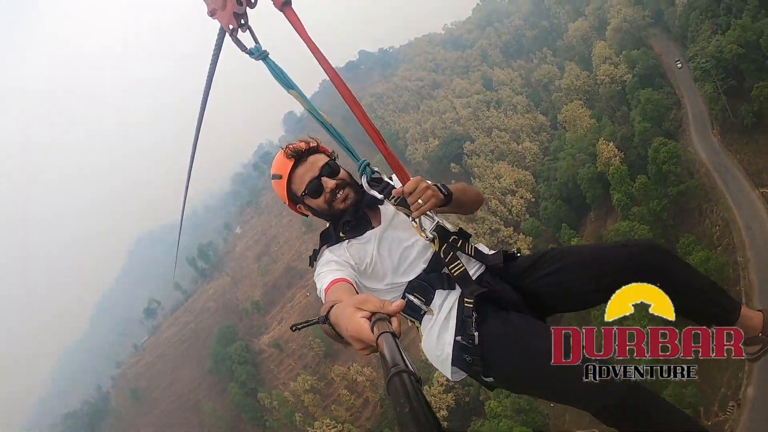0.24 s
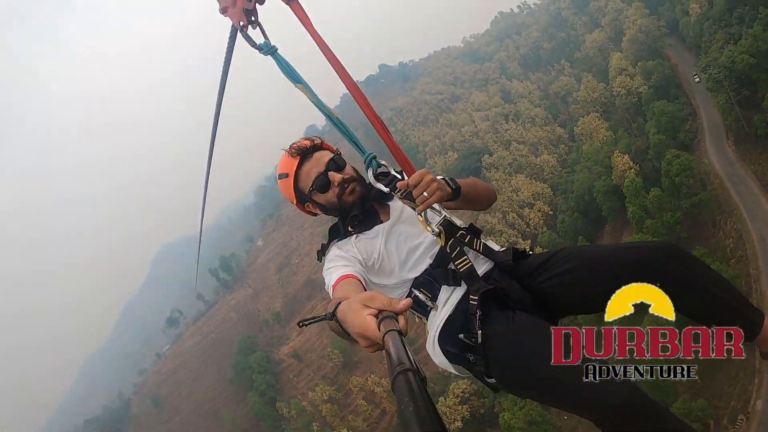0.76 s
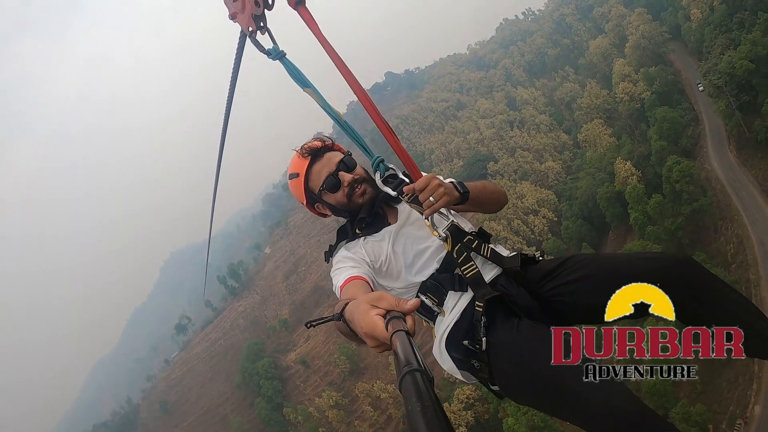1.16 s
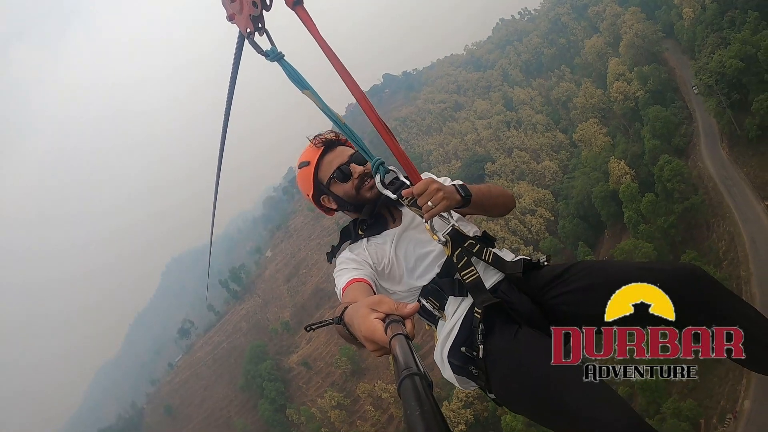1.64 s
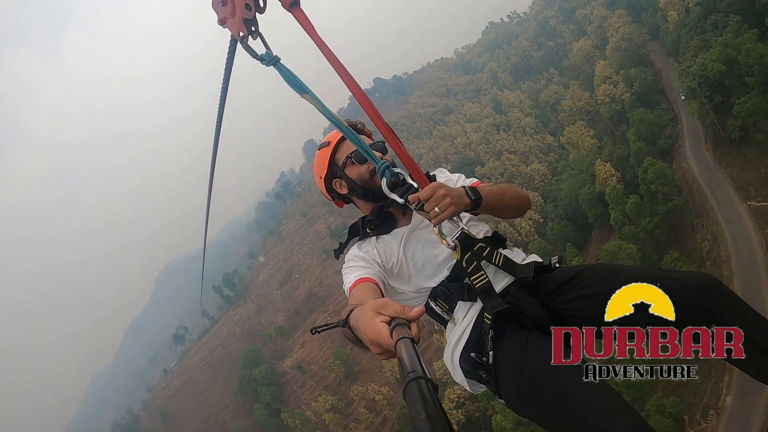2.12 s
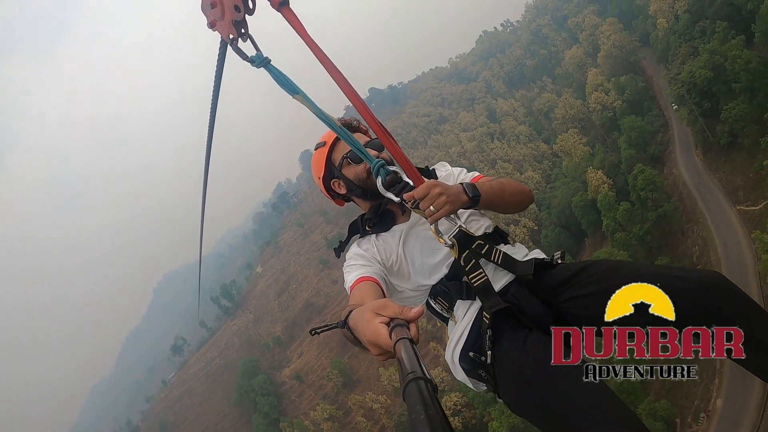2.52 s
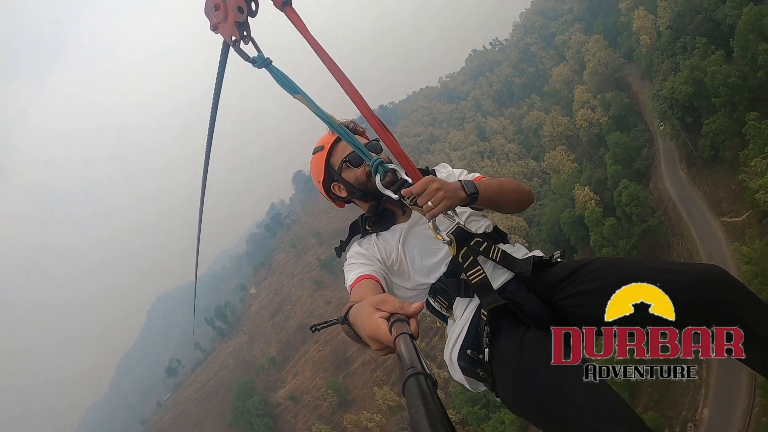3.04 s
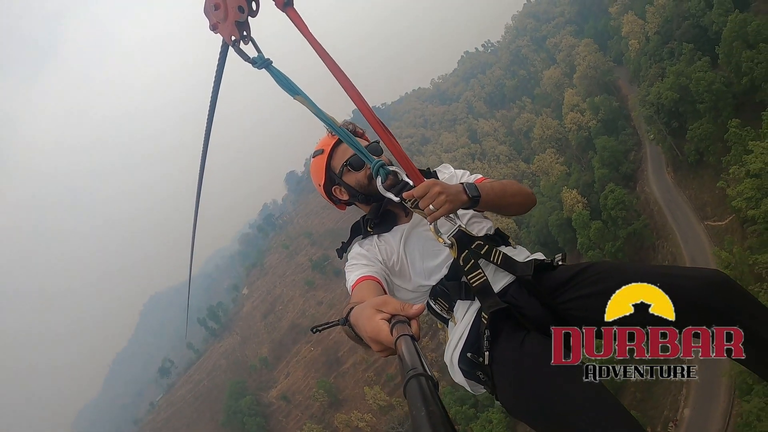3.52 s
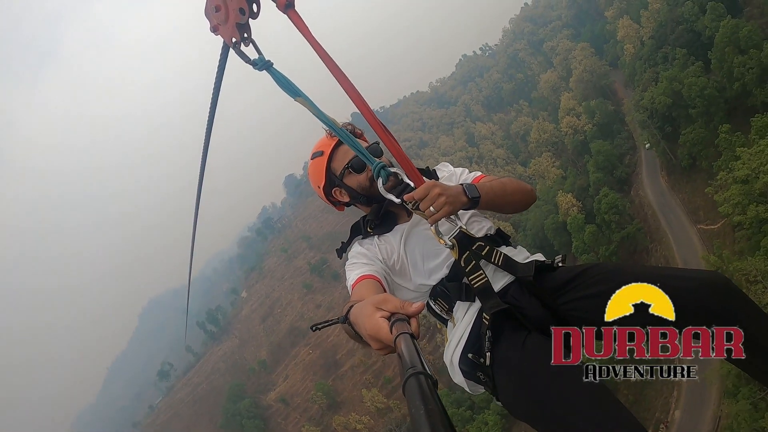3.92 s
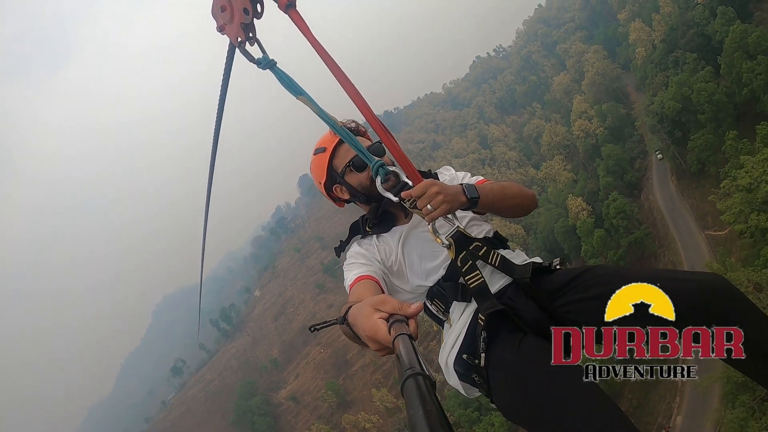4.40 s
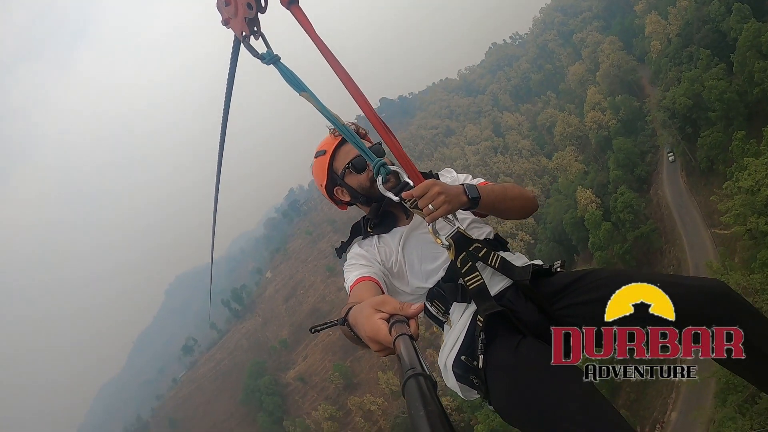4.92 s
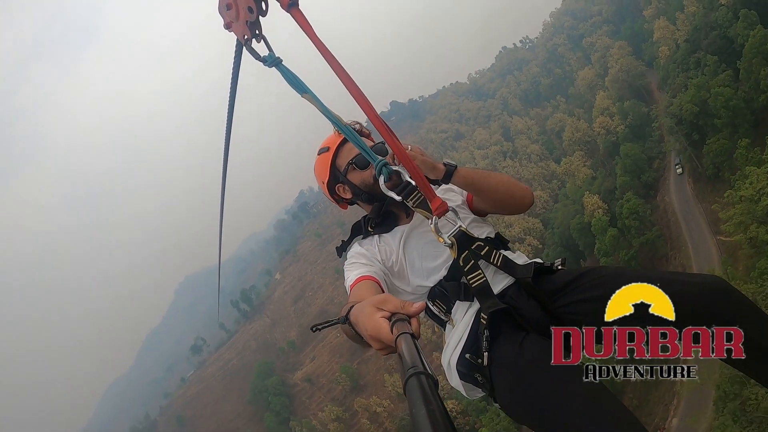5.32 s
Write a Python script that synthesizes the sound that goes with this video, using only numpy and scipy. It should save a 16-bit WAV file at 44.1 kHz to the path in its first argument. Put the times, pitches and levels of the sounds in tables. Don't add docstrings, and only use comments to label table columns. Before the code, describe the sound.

A rider's zipline pulley whirs continuously overhead, heard close and outdoors. Fine grinding patter on steel strands carries a nasal, wavering ring and a thinner hiss on top. Wind knocks low against the microphone, strongest in the first second and again near the middle. The rolling flickers with small hops, keeps its pace and is cut off mid-ride.

```python
import sys
import numpy as np
from scipy import signal
from scipy.fft import rfft, irfft
from scipy.io import wavfile
from scipy.ndimage import uniform_filter1d, minimum_filter1d

SR = 44100
rng = np.random.default_rng(int(sys.argv[2]) if len(sys.argv) > 2 else 0)


def bounce(signal):
    frames = np.transpose(np.atleast_2d(signal))
    limited = np.clip(frames, -1, 1)
    pcm = np.round(limited * 32767).astype(np.int16)
    wavfile.write(sys.argv[1], SR, pcm)


def attenuation_scalar(level_db):
    decades = np.asarray(level_db, float) / 20
    return 10 ** decades


N = 244755
HZ = np.maximum(np.fft.rfftfreq(N, 1 / SR), 1)

# pitch_hz, lead_rad
PORT_LEAD = [(230, .1), (700, -.08), (1000, -.62), (1350, -.87), (1800, -.37), (2300, 1.04), (2700, 1.07),
             (3650, .84), (3950, 1.8), (4150, 2.6), (4300, 1.0), (4600, .45), (5050, -1.6)]


def trolley():
    # pitch_hz, width_hz, level_db over the broad response, lean_rad to low or high side
    rings = [(521, 122, 5.5, -1.19), (1033, 33, 1.6, 1.03), (1128, 13, -8, 0.023), (1286, 33, -4, 1.1),
             (1325, 37, 1.5, 0.12), (1356, 19, 3.5, -0.86), (1570, 77, 1.5, 1.58), (1808, 26, 6.5, .7),
             (1963, 49, 3.5, -.4), (2110, 110, 3.5, -.8), (2353, 84, 8, -0.85), (2420, 55, -0.5, -1.1),
             (2630, 45, -1, -0.6), (3034, 24, 2.5, .3), (3215, 100, -8.5, 0.36), (3690, 40, 2, -1.3),
             (3875, 190, -3, -0.71), (4245, 80, -1.5, -.25)]
    # pitch_hz, level_db per Hz
    frame = [(230, -32), (400, -30.5), (650, -14), (850, -13), (1000, -1.5), (1200, -8.5), (1450, -15),
             (1750, -20.5), (2200, -16), (2750, -10.5), (3400, -9), (4100, -14), (4600, -20), (5200, -45.5)]
    # pitch_hz, share (0 to 1)
    likeness = [(230, 0.91), (400, 1), (3600, 0.97), (3900, 0.8), (4600, 0.8), (5200, 0.3), (6500, 0.5),
                (8500, 0.1), (15000, 0.3)]
    # pitch_hz, level_db per Hz
    hiss_left = [(5000, 0.5), (5500, -10), (6000, -11.8), (6700, -10.1), (8550, -20.2), (8800, -32),
                 (9300, -20.8), (9900, -27.7), (10300, -36.6), (10900, -27.3), (12600, -32.7), (13600, -49),
                 (14800, -41), (15700, -40)]
    hiss_right = [(5000, 1.5), (5500, -8.5), (6000, -7.4), (6700, -9.2), (7800, -22.4), (8500, -33.4),
                  (9500, -35.4), (11500, -35.1), (12200, -33.6), (12700, -41.6), (13600, -51.1),
                  (14200, -47.1), (15000, -46.5), (15700, -59.3)]
    cross_hz = 5050

    load_db, jolt_db = load()
    flutter = drift(17.0)
    growth_db = 6 * np.tanh(np.arange(N) / SR / 3.4)
    hum_db = -43 + 0.53 * load_db + growth_db + 1.5 + 1.5 * flutter
    whine_db = -21.5 + load_db - 1.5
    rasp_db = -25 + 0.25 * load_db + jolt_db + 0.92 * flutter
    hiss_db = -58.5 + 0.25 * load_db + 1.4 * jolt_db + 3.5 + 0.64 * flutter + 0.71 * drift(35)

    modes = 1
    for hz, width_hz, level_db, lean_rad in rings:
        modes = modes + attenuation_scalar(level_db) * np.exp(1j * lean_rad) / (1 + 2j * (HZ - hz) / width_hz)
    left = attenuation_scalar(at_hz(frame)) * modes
    right = left * right_port()
    common = at_hz(likeness)
    clicks = patter(per_s=14000, spread_db=2.5)

    out = 0
    for level_db, low_hz, high_hz in ((hum_db, 235, 803),
                                      (whine_db, 884, 1492),
                                      (rasp_db, 1457, cross_hz)):
        part = band(low_hz, high_hz, order=40)
        rolling = two_ports(clicks, left * part, right * part, common)
        out = out + attenuation_scalar(level_db) * evened(rolling, size=2500, share=0.72)

    treble = band(cross_hz, 15700, order=40)
    hiss_lead = np.exp(1j * at_hz(PORT_LEAD))
    hiss = two_ports(clicks, treble * attenuation_scalar(at_hz(hiss_left)), treble * attenuation_scalar(at_hz(hiss_right)) * hiss_lead, common)
    return out + attenuation_scalar(hiss_db) * hiss


def patter(per_s, spread_db):
    strength = np.minimum(rng.exponential(1, (2, N)), 4)
    sizes = attenuation_scalar(spread_db * strength) * rng.choice([-1, 1], (2, N))
    return sizes * (rng.random((2, N)) < per_s / SR)


def load():
    # time_s, level_db
    slow_load = [(0, 1.5), (.5, -0.5), (1.5, 0), (2.2, -1.5), (2.75, 0), (3.1, -0.5), (3.7, -1),
                 (4.1, -1.5), (4.6, -2), (5.1, -1), (5.55, -1.5)]
    # time_s of the peak, level_db
    jolts = [(.01, 2), (0.041, 0), (0.689, -4.5), (0.714, 1), (1.02, 1.5), (1.22, -4.5), (1.41, -3),
             (1.48, 1.5), (1.505, -2), (1.58, 2.5), (1.62, -4), (1.665, 0.5), (1.686, 0.5), (1.73, 3),
             (2.5, 3), (2.92, 3), (2.95, -2.5), (2.97, 2), (3.014, -0.5), (3.77, -3.5), (3.82, 2),
             (3.85, -2.5), (3.961, 2.5), (5.19, -5.5), (5.24, 0), (5.501, -3.5), (5.545, 1)]
    half_s = 0.018
    t = np.arange(N) / SR
    load_db, = in_time(slow_load)
    jolt_db = sum(db * np.clip(1 - np.abs(t - peak_s) / half_s, 0, 1) for peak_s, db in jolts)
    return load_db, jolt_db


def right_port():
    # pitch_hz, level_db
    shadow = [(230, 1), (600, 4.5), (860, 9.5), (900, 6.5), (1250, 6), (1750, -3.5), (1820, -3.5),
              (2600, 2.5), (3000, 4), (3750, 17.5), (4050, 13), (4200, 9), (4400, 14), (5030, -5.5)]
    return attenuation_scalar(-at_hz(shadow)) * np.exp(1j * at_hz(PORT_LEAD))


def singing_wheels():
    # time_s, pitch_hz, level_db
    front_wheel = [(0, 1345, -29), (.17, 1305, -30.5), (.33, 1345, -24), (.68, 1330, -28),
                   (.92, 1354, -21.5), (1.25, 1342, -28.5), (1.8, 1350, -26.5), (2.25, 1336, -26.5),
                   (2.6, 1342, -28.5), (2.8, 1345, -23), (3.05, 1335, -24.5), (3.25, 1345, -37),
                   (3.4, 1350, -26.5), (4.25, 1334, -25), (4.62, 1337, -27.5), (4.76, 1320, -40.5),
                   (4.88, 1346, -25), (5.55, 1340, -27.5)]
    rear_wheel = [(0, 1115, -22.5), (.45, 1106, -28), (.75, 1127, -31), (1.2, 1115, -33), (1.7, 1108, -30),
                  (2.3, 1118, -39), (2.6, 1102, -32), (3.1, 1118, -36), (3.45, 1129, -29),
                  (3.7, 1100, -33.5), (3.85, 1122, -28.5), (4.2, 1120, -29), (4.37, 1120, -28),
                  (4.75, 1116, -27.5), (4.95, 1105, -31.5), (5.55, 1122, -28.5)]
    front = wheel_song(front_wheel, wobble_hz=13.45, trim_db=-2.0, grip_db=2.5)
    rear = wheel_song(rear_wheel, wobble_hz=8.25, trim_db=-2.0, grip_db=2.5)
    return front + rear


def wheel_song(rows, wobble_hz, trim_db, grip_db):
    hz, level_db = in_time(rows)
    wobble = drift(30.55) + 0.5 * drift(9.12)
    tone = np.sin(2 * np.pi * np.cumsum(hz + wobble_hz * wobble) / SR)
    grip = drift(18.0)
    slips = rms_one(grip - uniform_filter1d(grip, size=6000))
    gain = attenuation_scalar(level_db + trim_db + grip_db * slips)
    return gain * two_ports([tone, tone], 0.81, right_port(), 1)


def wind():
    # pitch_hz, level_db per Hz
    thump_colour = [(7.1, -31.5), (12, -3), (43, 2), (72, -2), (110, -20), (140, -40.5), (240, -120)]
    rustle_colour = [(47, -27), (80, -1), (145, -6), (221, -18), (260, -30.5), (340, -50.5), (570, -120)]
    thump_db, rustle_db = gusts()
    thump_gain = attenuation_scalar(at_hz(thump_colour)) * band(16, 90)
    rustle_gain = attenuation_scalar(at_hz(rustle_colour)) * band(90, 220, order=16)
    lumps = drift(22)
    out = 0
    for level_db, gain, common, right_db in ((thump_db, thump_gain, 0.82, -3.8),
                                             (rustle_db, rustle_gain, 0.86, -2.5)):
        air = two_ports(rng.standard_normal((2, N)), gain, gain * attenuation_scalar(right_db), common)
        out = out + attenuation_scalar(level_db + 1.5 * lumps) * rms_one(evened(air, size=1500, share=0.81))
    return out


def gusts():
    # peak_s, thump_db, rustle_db, length_s
    eddies = [(0.028, -27, -44, .08), (0.143, -25.5, -43.5, 0.058), (.23, -19, -28.5, 0.055),
              (0.488, -22.5, -45, .04), (0.543, -13.5, -30, 0.017), (0.934, -26.5, -41.5, 0.03),
              (1.057, -29.5, -42, .07), (1.275, -32.5, -38.5, .04), (1.36, -27, -51, .03),
              (1.585, -26.5, -43, 0.11), (2.022, -31.5, -47, 0.047), (2.721, -29.5, -42, .03),
              (2.827, -30, -47.5, .03), (2.909, -16.5, -35.5, 0.02), (3.008, -26, -40, 0.074),
              (3.147, -29, -35.5, .04), (3.258, -33.5, -36, 0.044), (3.341, -21.5, -42, 0.028),
              (3.425, -29, -42, 0.036), (3.586, -25.5, -38.5, .045), (3.693, -32, -44.5, 0.046),
              (3.846, -24, -32.5, 0.024), (3.953, -28.5, -40, 0.061), (4.049, -31.5, -40, 0.044),
              (4.244, -29, -37, 0.066), (4.646, -30.5, -41.5, 0.047), (4.758, -21.5, -39.5, 0.032),
              (4.87, -32.5, -41.5, .04), (5.131, -23.5, -37.5, .06), (5.427, -25, -47.5, .045)]
    # time_s, level_db
    breeze = [(0, -39), (.6, -44.5), (.9, -44), (1.75, -36.5), (2.0, -42), (2.35, -37), (2.55, -42.5),
              (3.1, -38.5), (4.1, -40.5), (4.4, -34.5), (5.0, -35.5), (5.55, -42)]
    rise_db, fall_db = 10.5, 13.5
    t = np.arange(N) / SR
    breeze_db, = in_time(breeze)
    thump_power = attenuation_scalar(2 * breeze_db)
    rustle_power = attenuation_scalar(2 * (-45 + 0.4 * (breeze_db - breeze_db.mean())))
    for peak_s, thump_db, rustle_db, length_s in eddies:
        away = (t - peak_s) / max(length_s, 0.01)
        shape = attenuation_scalar(2 * np.minimum(rise_db * away, -fall_db * away))
        thump_power = thump_power + attenuation_scalar(2 * thump_db) * shape
        rustle_power = rustle_power + attenuation_scalar(2 * rustle_db) * shape
    return 10 * np.log10(thump_power), 10 * np.log10(rustle_power)


def two_ports(drive, left, right, common):
    shared, own = rfft(drive)
    common = np.clip(common, 0, 1)
    other = np.sqrt(common) * shared + np.sqrt(1 - common) * own
    return rms_one(irfft([left * shared, right * other], N))


def evened(x, size, share):
    power = uniform_filter1d(uniform_filter1d(np.mean(x ** 2, axis=0), size), size)
    return x * (power / np.mean(power) + 1e-3) ** (-np.clip(share, 0, 1) / 2)


def drift(rate):
    return rms_one(irfft(rfft(rng.standard_normal(N)) / (1 + (HZ / rate) ** 2), N))


def rms_one(x):
    return x / np.sqrt(np.mean(np.mean(np.atleast_2d(x), axis=0) ** 2) + 1e-20)


def in_time(rows):
    s, *columns = np.transpose(rows)
    return [np.interp(np.arange(N) / SR, s, c) for c in columns]


def at_hz(points):
    hz, value = np.transpose(points)
    return np.interp(np.log(HZ), np.log(hz), value)


def band(low_hz, high_hz, order=8):
    return 1 / np.sqrt((1 + (low_hz / HZ) ** order) * (1 + (HZ / high_hz) ** order))


def scene():
    return trolley() + singing_wheels() + wind()


def dropped_bands(x, scatter_db):
    # pitch_hz, level_db per line
    faint = [(5000, -80), (6000, -83), (7000, -87), (8300, -97), (11000, -102), (12500, -106),
             (13600, -118), (15700, -112)]
    shift = 292
    hz, _, lines = signal.stft(np.pad(x, [(0, 0), (shift, 0)]), SR, "cosine", 2048)
    groups = lines[:, :1024].reshape(2, 256, 4, -1)
    level_db = 10 * np.log10(np.mean(np.abs(groups) ** 2, axis=2) + 1e-20)
    limit_db = np.interp(hz[2:1024:4], *np.transpose(faint), left=-200)[:, None]
    shift_db = scatter_db * np.repeat(rng.standard_normal((2, 32, groups.shape[-1])), 8, axis=1)
    heard = level_db > limit_db + shift_db
    lines[:, :1024] = (groups * heard[:, :, None]).reshape(2, 1024, -1)
    return signal.istft(lines, SR, "cosine", 2048)[1][:, shift:shift + N]


def limited(x):
    room = minimum_filter1d(np.minimum(0.5 / (np.abs(x).max(axis=0) + 1e-9), 1), size=300)
    return x * uniform_filter1d(uniform_filter1d(room, size=100), size=100)


def band_limit(x):
    return signal.sosfilt(signal.butter(12, 15730, fs=SR, output="sos"), x)


def record(dry):
    held = limited(evened(dry, size=1600, share=0.35))
    edge = np.minimum(np.arange(N), np.arange(N)[::-1])
    eased = held * np.sin(np.pi / 2 * np.minimum(edge / 60, 1)) ** 2
    mix = dropped_bands(eased, scatter_db=4.0)
    return band_limit(mix)


dry = scene()
out = record(dry)
bounce(out)
```